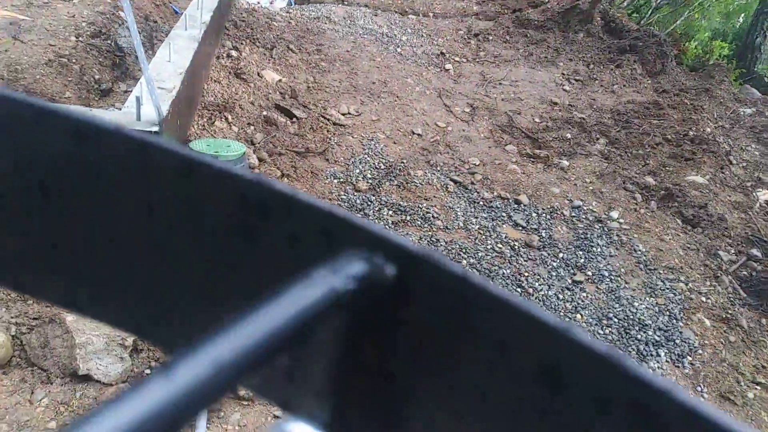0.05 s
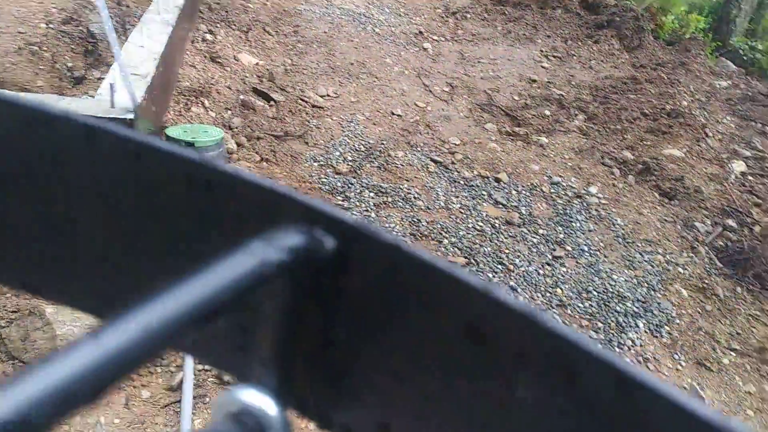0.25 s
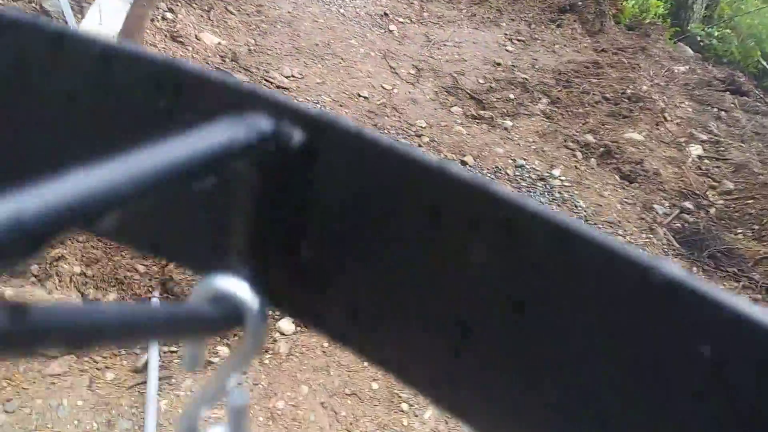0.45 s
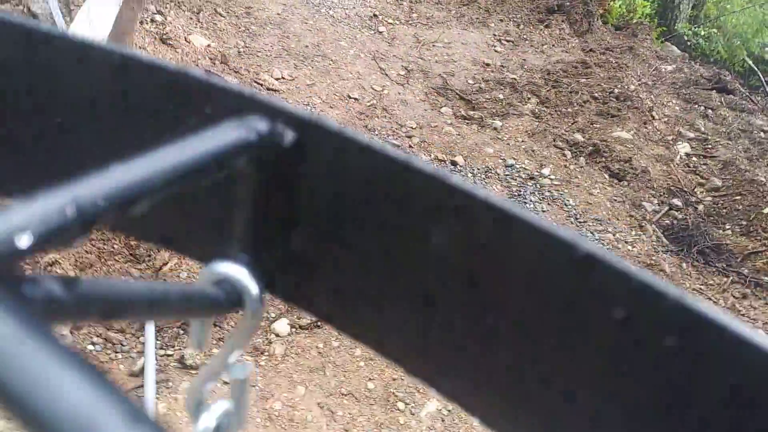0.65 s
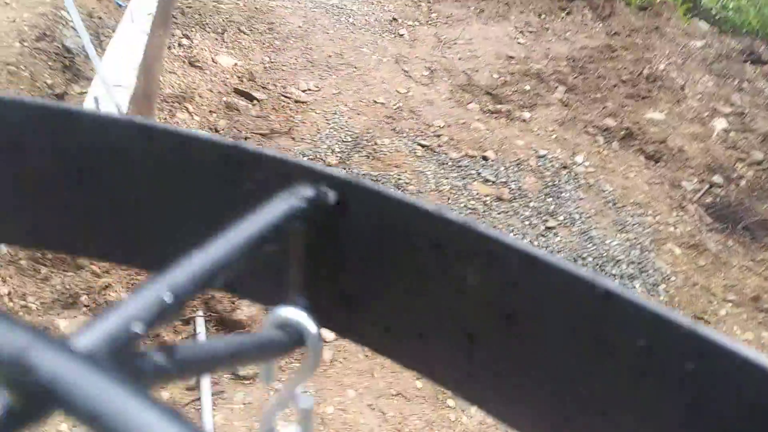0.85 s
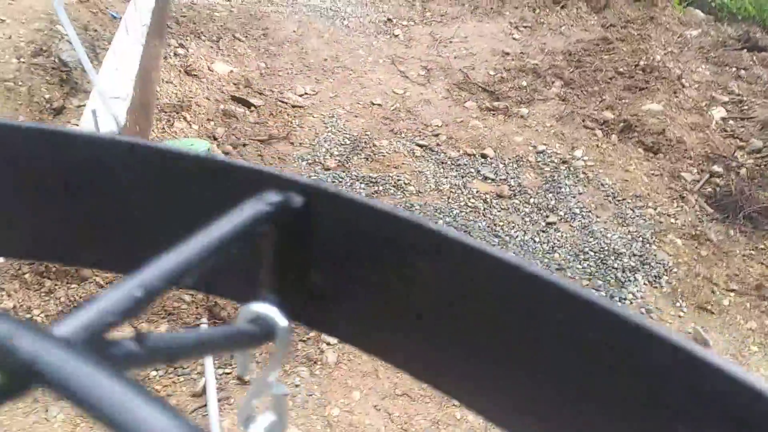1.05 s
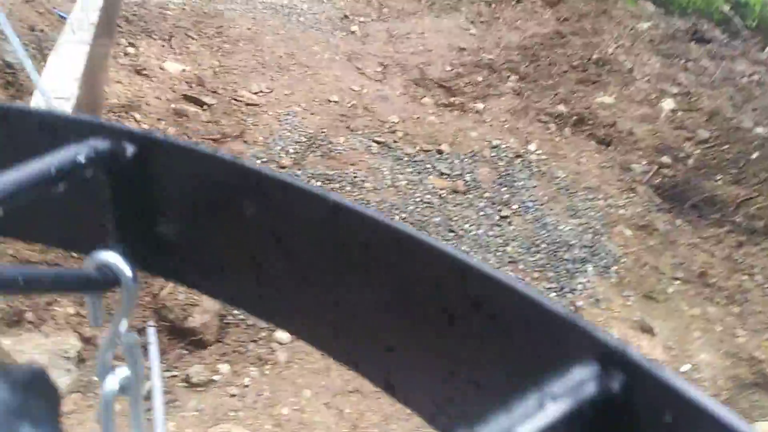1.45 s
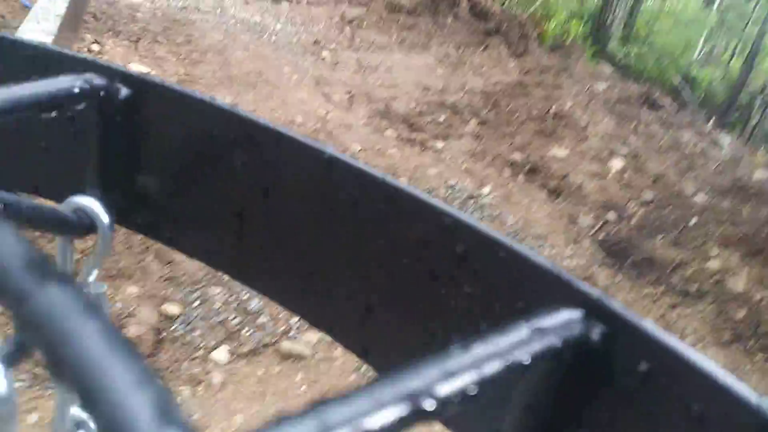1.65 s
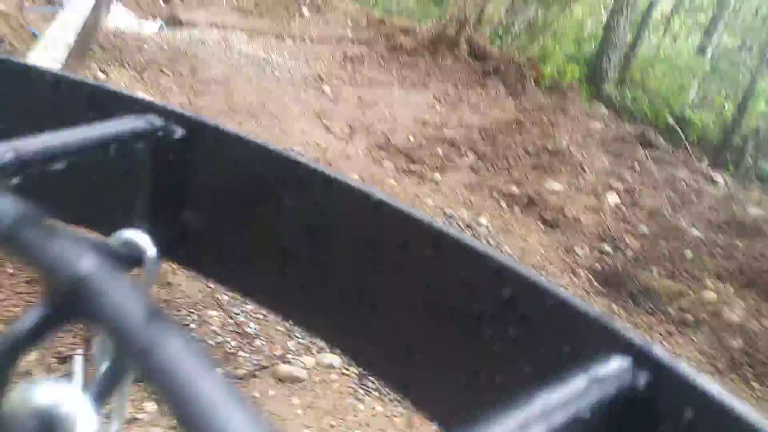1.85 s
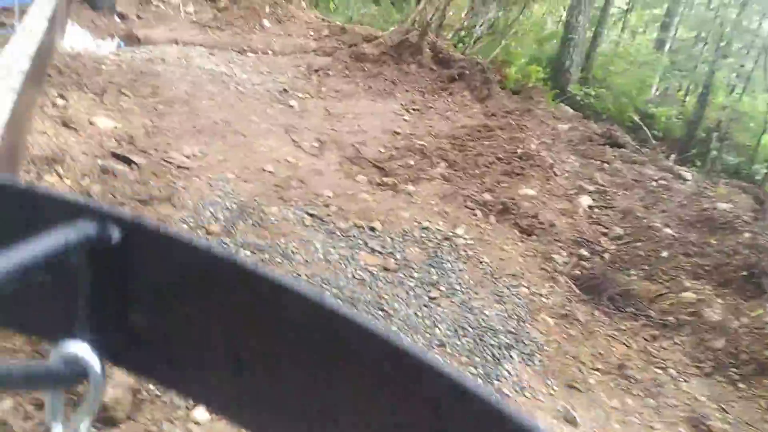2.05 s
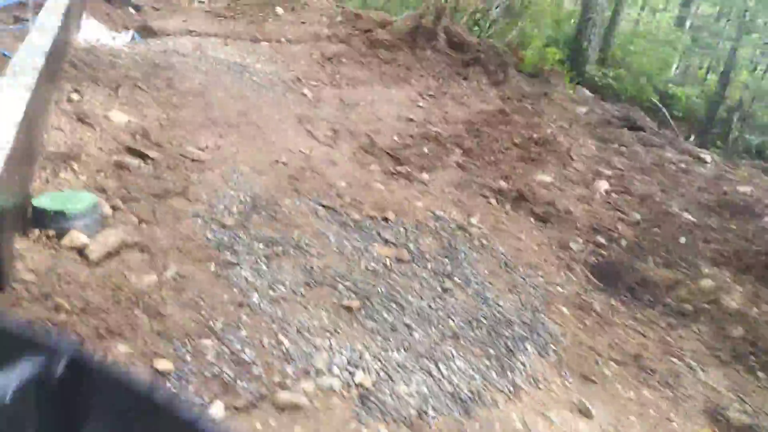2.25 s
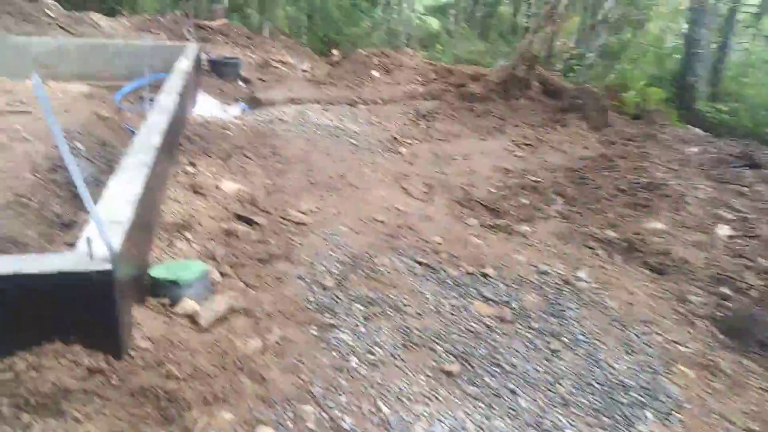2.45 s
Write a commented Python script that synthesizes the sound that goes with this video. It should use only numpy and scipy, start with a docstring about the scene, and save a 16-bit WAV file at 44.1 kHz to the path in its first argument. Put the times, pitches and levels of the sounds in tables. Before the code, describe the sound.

Close metal knocking and clanking from a jostled frame with chains, over low outdoor rumble.

```python
"""A steel frame hung with chains is jostled up close, outdoors on a dirt building site.
Its loose joints knock and chatter; heavy knocks set the frame and its tubes ringing, and the loudest
overload the microphone. Hooks clank on their bars, small chain links tink against each other,
and metal rubs now and then. Under it all lies a bed of low outdoor rumble."""
import sys
import numpy as np
from scipy import signal
from scipy.fft import rfft, irfft
from scipy.io import wavfile
from scipy.ndimage import uniform_filter1d, minimum_filter1d

SR = 44100
rng = np.random.default_rng(int(sys.argv[2]) if len(sys.argv) > 2 else 0)


def wav_out(sig):
    """Save sig, one row per channel (or a flat mono array), as 16-bit PCM at SR to the path in sys.argv[1]."""
    wavfile.write(sys.argv[1], SR, np.round(np.clip(np.atleast_2d(sig).T, -1, 1) * 32767).astype(np.int16))


N = 114660
TIME = np.arange(N) / SR

# colour of the outdoor rumble and hiss: (frequency [Hz], relative density [dB])
AIR_SPECTRUM = [(25, -46), (70, -2), (300, 0), (800, -2.5), (3300, -7), (4800, -33.5), (15500, -37)]
# strokes of metal on metal: (start [s], length [s], level [dB], low edge [Hz], high edge [Hz])
RUB_STROKES = [(0.069, 0.096, -33.5, 610, 900), (1.109, 0.18, -24, 740, 930),
               (0.988, 0.28, -52.5, 2600, 8900)]
# small links touch: (time [s], lowest mode level [dB], upper modes level [dB])
LINK_HITS = [(0.681, -47, -64), (1.015, -34, -45), (1.045, -37, -42), (1.0677, -44, -30), (1.091, -25, -41),
             (1.125, -34, -42), (1.18, -37.5, -48), (1.274, -50, -40), (1.334, -43, -47),
             (1.355, -46.5, -49), (1.381, -40.5, -45), (1.448, -37, -39), (1.467, -38, -49),
             (1.5107, -42, -34), (1.537, -63, -46), (1.569, -43, -38), (1.668, -41, -39), (1.851, -39, -52),
             (1.8814, -36, -31.5), (2.198, -42, -38), (2.222, -42, -31), (2.335, -41, -45)]
# a link's ping: (frequency [Hz], relative level [dB])
LINK_PARTIALS = [(8560, 5), (10400, -2), (12400, -7.5), (15620, 4)]
# hooks hit their bars: (time [s], ring [dB], shimmer [dB], crash [dB], favoured frequency [Hz])
HOOK_HITS = [(0.736, -30, -68, -43.5, 3600), (0.852, -33, -56, -31.5, 3740), (1.498, -37.5, -63, -39, 3770),
             (1.5768, -19.5, -41, -19.5, 3670), (1.705, -26, -66, -34.5, 3000),
             (1.734, -29, -51, -28, 3860), (1.7899, -38.5, -48, -30.5, 3020),
             (1.886, -18, -36, -21.5, 3080), (2.22, -25.5, -46, -24, 2430), (2.372, -32.5, -52, -33, 2870)]
# a hook's ring: (frequency [Hz], relative level [dB], t60 [s])
HOOK_PARTIALS = [(1675, -4, .18), (1830, -2, .11), (2300, -8, .45), (2401, -8, .38), (2611, -6, .33),
                 (2955, -7, .4), (3461, -3, .24), (4105, -11, .2), (4850, -16, .18), (5730, -22, .22)]
# the chain's shimmer: (frequency [Hz], relative level [dB])
SHIMMER_PARTIALS = [(6424, -6), (6565, -10), (6677, -3), (6831, -8), (7005, -10), (7263, -5), (7542, -6),
                    (8400, -6), (10400, -9), (15570, -8)]
# colour of a clank's short crash: (frequency [Hz], relative density [dB])
CRASH_SPECTRUM = [(300, -37), (1200, -10), (1800, 5.5), (3300, 4), (4300, -11), (5500, -25), (8500, -10.5),
                  (15500, -45.5)]
# fader curve of the fine rattle between knocks: (time [s], level [dB])
RATTLE_CURVE = [(0, -45), (.27, -51), (.4, -29), (.8, -48), (1.05, -38.5), (1.22, -30), (1.4, -32),
                (1.85, -34), (2.1, -43.5), (2.28, -34), (2.45, -43)]
# single tones that swell and fade after loud knocks: (time [s], frequency [Hz], level [dB])
TONE_SWELLS = [(0.353, 117, -24), (.367, 3426, -17), (.415, 3464, -23.5), (0.62, 149, -24.5),
               (0.769, 165.3, -28.5), (1.696, 164, -21), (2.221, 845, -20)]
# colour of the frame's dense ringing: (frequency [Hz], relative density [dB])
FRAME_SPECTRUM = [(70, -29), (150, -7), (400, -0.5), (750, -5), (1850, 0.5), (2600, -7.5), (3300, -6.5),
                  (4200, -22.5), (5500, -47), (15000, -56)]
# hollow notes of the frame's tubes: (frequency [Hz])
TUBE_NOTES = [381.4, 539, 750, 1116]
# the microphone overloads: (time [s], crackle level [dB], crackle t60 [s], thump level [dB])
OVERLOADS = [(0.301, -32.5, 0.18, -43), (.352, -21, 0.0069, -38), (1.7045, -24, 0.044, -48)]
# dead resonances behind thud, knock and clack: (low edge [Hz], high edge [Hz])
JOINT_BANDS = [(230, 596), (690, 1282), (1500, 2450)]
# joints knock, at relative levels: (time [s], chatter length [ms], thud [dB], knock [dB], clack [dB])
JOINT_HITS = [(0.0242, 5, -44, -27, -32), (.211, 0.57, -28, -14.5, -23.5), (.231, 2.5, -35, -23.5, -46),
              (0.2821, 2.8, -41, -36, -46), (0.3, 7.5, -15, -9, -6.5), (.331, 24, -30, -10.5, -11),
              (0.352, 3.6, -19.5, -13, -10), (.359, 13, -26.5, -29, -13), (0.426, 24, -29, -18, -31),
              (0.4385, 11, -27.5, -21.5, -20.5), (0.5554, 11, -24, -16, -18.5),
              (0.6189, 9.7, -21, -14, -18.5), (.681, 8.5, -23.5, -12.5, -27),
              (0.7447, 3.5, -25, -23.5, -19.5), (0.752, 12.3, -25, -19, -18.5),
              (0.776, 26, -23, -19.5, -27), (.835, 28, -33, -21.5, -25), (.95, 5.5, -33.5, -29, -43),
              (0.9901, 6.7, -25.5, -34, -24.5), (1.044, 7.6, -25, -20, -19.5),
              (1.0815, 7.9, -33, -12.5, -13.5), (1.1144, 2.1, -46, -36, -41), (1.126, 21, -22.5, -14, -36),
              (1.1354, 8.4, -27.5, -17, -9), (1.162, 3.6, -24, -12.5, -37),
              (1.2747, 5.6, -37, -20.5, -20.5), (1.3155, 6.6, -33.5, -21, -10.5),
              (1.323, 6.9, -31.5, -33, -8), (1.3499, 6.6, -38, -20, -22), (1.463, 5.7, -46, -17, -10.5),
              (1.4719, 6.8, -67, -18, -10), (1.6174, 5.5, -57, -23.5, -22), (1.6301, 4.4, -24, -24, -18.5),
              (1.6381, 5, -23.5, -14.5, -16.5), (1.6588, 2.1, -46, -49, -18.5),
              (1.6902, 7.6, -19.5, -15.5, -18), (1.7046, 6.6, -20, -13, -3), (1.717, 20, -24.5, -13.5, -13),
              (1.7598, 7.8, -34, -16, -17.5), (1.7841, 10, -39, -19, -20), (1.84, 9.1, -30.5, -27, -28),
              (2.016, 4.8, -58, -27, -27.5), (2.0373, 5.2, -35, -23, -55), (2.1433, 11.4, -37, -24, -19),
              (2.1728, 8.6, -33, -17.5, -15.5), (2.2107, 12, -37.5, -22, -17.5),
              (2.2215, 7.5, -64, -16, -29), (2.267, 2.5, -49, -25, -18), (2.2731, 5.7, -46, -25, -21.5),
              (2.291, 2.6, -39, -25, -16.5), (2.2995, 3.9, -51, -22, -24), (2.329, 14, -37.5, -24, -19),
              (2.4082, 8.5, -42, -22.5, -27), (2.5734, 6.8, -36, -32, -19.5)]

AIR_DB, KNOCK_DB, FRAME_DB, TUBE_DB = -45.5, -6.5, -5, -14.5
CUTOFF_HZ, JOINT_TOP_HZ, ATTACK_S = 15900, 4400, 0.0007
LINK_DETUNE, LINK_SPREAD_DB, LINK_TAIL_DB, TICK_DB = 0.0294, 4, -19, -2
BOUNCE_S, BOUNCE_DB = 0.029, -12
FAVOUR_DB_PER_OCTAVE, NEIGHBOUR_DETUNE, NEIGHBOUR_DB, STRIKE_SPREAD_DB = 11, 0.0126, -3, 2.5
SHIMMER_T60_S = 0.26
FRAME_LOWEST_HZ, FRAME_SPLIT_HZ, TUBE_SPREAD_DB = 81, 550, 4
CRACKLE_TOP_HZ, THUMP_HZ = 3430, 55
CHATTER_DB, CHATTER_SPREAD_DB = -19.5, 5


def from_db(db):
    return 10 ** (np.asarray(db) / 20)


def rms_one(x):
    return x / np.sqrt(np.mean(x ** 2) + 1e-20)


def add(track, s, sound):
    """Mixes a sound in at time s."""
    i = max(int(s * SR), 0)
    track[i:i + len(sound)] += sound[:max(N - i, 0)]


def butter(x, hz, kind, order=2):
    sos = signal.butter(order, np.clip(hz, 10, .45 * SR), kind, fs=SR, output="sos")
    return signal.sosfilt(sos, x + 1e-18)


def attack(size=N, rise_s=ATTACK_S):
    return 1 - np.exp(-TIME[:size] / rise_s)


def decay(t60, size=N):
    return from_db(-60 * TIME[:size] / t60)


def noise(spectrum):
    """Steady noise of the given colour; rms 1."""
    hz, db = np.transpose(spectrum)
    bins_hz = np.maximum(np.arange(N // 2 + 1) * SR / N, 1)
    colour = from_db(np.interp(np.log(bins_hz), np.log(hz), db))
    return rms_one(irfft(rfft(rng.standard_normal(N)) * colour, N))


def clicks(per_s, spread_db):
    """Random contacts of uneven size."""
    impulses = (rng.random(N) < per_s / SR) * rng.choice([-1, 1], N)
    return impulses * from_db(spread_db * np.minimum(rng.exponential(1, N), 4))


def sine(hz, size):
    """A tone with a random starting phase."""
    return np.sin(2 * np.pi * (hz * TIME[:size] + rng.random()))


def partial(hz, t60, size=N):
    """One dying mode."""
    return sine(hz, size) * decay(t60, size)


def scatter(spectrum, low_hz, count, size):
    """Many partials at random pitches under a spectrum; rms 1."""
    hz, db = np.transpose(spectrum)
    pitches = low_hz + (CUTOFF_HZ - low_hz) * (np.arange(count) + rng.random(count)) / count
    return rms_one(sum(from_db(np.interp(f, hz, db)) * sine(f, size) for f in pitches))


def air():
    """The bed: steady outdoor rumble with a little hiss."""
    return from_db(AIR_DB) * noise(AIR_SPECTRUM)


def rubs():
    """Uneven slips feed a resonance under a swelling stroke: low on the frame, gritty along the chain."""
    out = np.zeros(N)
    for s, length, db, low_hz, high_hz in RUB_STROKES:
        slips = rms_one(butter(clicks(per_s=3700, spread_db=3.5), [low_hz, high_hz], "band"))
        progress = np.clip((TIME - s) / length, 0, 1)
        out += from_db(db) * slips * np.sqrt(np.abs(np.sin(np.pi * progress)))
    return out


def link_tinks(size=8000):
    """Links touch and bounce three times: a bright tick, a damped ping of varying pitch, a faint tail."""
    out = np.zeros(N)
    for s, low_db, top_db in LINK_HITS:
        for delay in [0, *BOUNCE_S * rng.exponential(size=3)]:
            tick = scatter(LINK_PARTIALS, low_hz=7080, count=12, size=size) * decay(t60=0.04, size=size)
            tink = from_db((low_db + top_db) / 2 + TICK_DB) * tick
            for k, (hz, db) in enumerate(LINK_PARTIALS):
                pitches = hz * (1 + LINK_DETUNE * rng.uniform(-1.02, 1, size=2))
                ping = sum(partial(f, t60=0.031, size=size) for f in pitches) / 2
                tail = from_db(LINK_TAIL_DB) * partial(hz, t60=0.2, size=size)
                mode_db = db + (top_db if k else low_db) + LINK_SPREAD_DB * rng.standard_normal()
                tink += from_db(mode_db) * (ping + tail)
            add(out, s + delay, from_db(BOUNCE_DB if delay else 0) * tink * attack(size))
    return out


def struck_metal(modes, size, favoured_hz=None):
    """Each mode beats against three neighbouring pieces; those far from a favoured pitch are softer."""
    out = np.zeros(size)
    for hz, db, t60 in modes:
        loss_db = FAVOUR_DB_PER_OCTAVE * abs(np.log2(hz / favoured_hz)) if favoured_hz else 0
        pitches = hz * (1 + NEIGHBOUR_DETUNE * rng.uniform(-0.947, 1, size=3))
        neighbours = from_db(NEIGHBOUR_DB) * sum(partial(f, t60, size) for f in pitches)
        gain = from_db(db - loss_db + STRIKE_SPREAD_DB * rng.standard_normal())
        out += gain * (partial(hz, t60, size) + neighbours)
    return out * attack(size)


def hook_clanks(size=30000):
    """A hook lands on its bar: a short crash, the hook's ring and the chain's shimmer."""
    out, crash_noise = np.zeros(N), noise(CRASH_SPECTRUM)
    shimmer_modes = [(hz, db, SHIMMER_T60_S) for hz, db in SHIMMER_PARTIALS]
    for s, hook_db, shimmer_db, crash_db, favoured_hz in HOOK_HITS:
        wash = np.roll(crash_noise, rng.integers(N))[:size] / 2
        clang = scatter(CRASH_SPECTRUM, low_hz=1200, count=45, size=size)
        crash = from_db(crash_db) * (wash + clang) * decay(t60=0.2, size=size)
        ring = from_db(hook_db) * struck_metal(HOOK_PARTIALS, size, favoured_hz)
        shimmer = from_db(shimmer_db) * struck_metal(shimmer_modes, size)
        add(out, s, crash + ring + shimmer)
    return out


def joint_rattle(joints=9, contacts_per_s=980):
    """Countless small contacts in the loose joints, each joint with a short resonance of its own."""
    grains = np.zeros(N)
    for hz in np.geomspace(704, 2210, joints):
        contacts = clicks(contacts_per_s / joints, spread_db=5.5)
        grains += rms_one(butter(contacts, [0.92 * hz, 1.21 * hz], "band"))
    fader = from_db(np.interp(TIME, *np.transpose(RATTLE_CURVE)))
    return fader * rms_one(butter(grains, JOINT_TOP_HZ, "low", order=4))


def tone_swells():
    """Single tones swell and fade: low booms and a high hook ring returning after the loud knocks."""
    out = np.zeros(N)
    for s, hz, db in TONE_SWELLS:
        add(out, s, from_db(db) * partial(hz, t60=0.17) * attack(rise_s=0.0054))
    return out


def mic_overload():
    """Overload crackle and a low thump as the loudest knocks distort the microphone."""
    out = np.zeros(N)
    thump = np.sin(2 * np.pi * THUMP_HZ * TIME) * decay(t60=2 / THUMP_HZ)
    for s, crackle_db, t60, thump_db in OVERLOADS:
        crackle = butter(rng.standard_normal(N), CRACKLE_TOP_HZ, "low", order=1) * decay(t60)
        add(out, s, from_db(crackle_db) * crackle + from_db(thump_db) * thump)
    return out


def frame_ring():
    """Heavier thuds ring the frame's many close modes harder; its tubes answer differently each time."""
    blows, tubes, modes = np.zeros(N), np.zeros(N), noise(FRAME_SPECTRUM)
    for s, _, thud_db, _, _ in JOINT_HITS:
        add(blows, s, from_db([thud_db + FRAME_DB]))
        for hz in TUBE_NOTES:
            note_db = thud_db + TUBE_DB + TUBE_SPREAD_DB * rng.standard_normal()
            add(tubes, s, from_db(note_db) * partial(hz, t60=0.14, size=SR // 2))
    lows = butter(modes, FRAME_SPLIT_HZ, "low") * decay(t60=0.43)
    highs = butter(modes, FRAME_SPLIT_HZ, "high") * decay(t60=0.4)
    response = (lows - highs) * attack()  # flipped polarity avoids a notch at the crossover
    ringing = signal.fftconvolve(blows, response)[:N]
    return butter(tubes + ringing, FRAME_LOWEST_HZ, "high")


def joint_knocks(size=3000):
    """A first contact and a burst of chatter excite three dead resonances: thud, knock and clack."""
    out, t = np.zeros(N), TIME[:size]
    trim = np.sqrt(.009 / t[-1])  # gives each band the energy of 9 ms at its level
    for s, chatter_ms, *band_dbs in JOINT_HITS:
        chatter = rng.standard_normal(size)
        chatter *= from_db(CHATTER_DB + CHATTER_SPREAD_DB * rng.standard_normal(size))
        force = chatter * np.exp(-(t * 1000 / chatter_ms) ** 2)
        force[0] += 1  # the first contact
        body = np.zeros(size)
        for k, (db, band) in enumerate(zip(band_dbs, JOINT_BANDS)):
            body += (-1) ** k * from_db(db) * rms_one(butter(force, band, "band"))
        add(out, s, trim * butter(body, JOINT_TOP_HZ, "low"))
    return from_db(KNOCK_DB) * out


def scene():
    """Mono mix: impacts and chains up front, rubs, rattle and air behind."""
    impacts = joint_knocks() + mic_overload() + frame_ring() + tone_swells()
    chains = hook_clanks() + link_tinks()
    return (impacts + chains + rubs() + joint_rattle() + air())[None]


def record(dry):
    """A fast limiter turns down the highest peaks, and a steep low-pass cuts the very top."""
    gain = minimum_filter1d(np.minimum(1, .9 / (np.abs(dry) + 1e-9)), size=89)  # 2 ms window
    limited = dry * uniform_filter1d(gain, size=89)
    return signal.sosfilt(signal.ellip(12, .2, 80, CUTOFF_HZ, fs=SR, output="sos"), limited)


dry = scene()
out = record(dry)
wav_out(out)
```